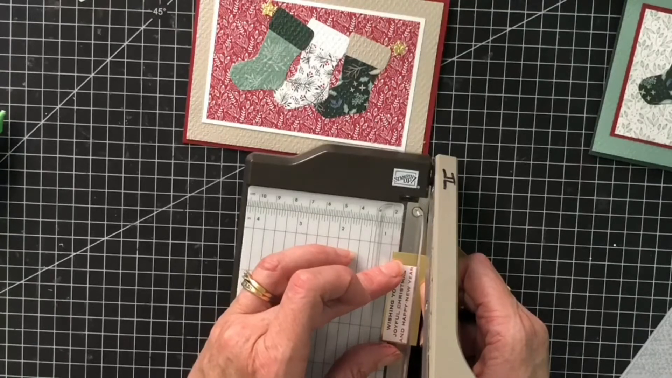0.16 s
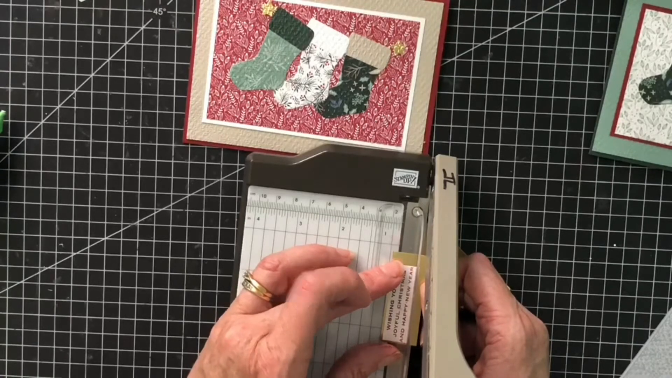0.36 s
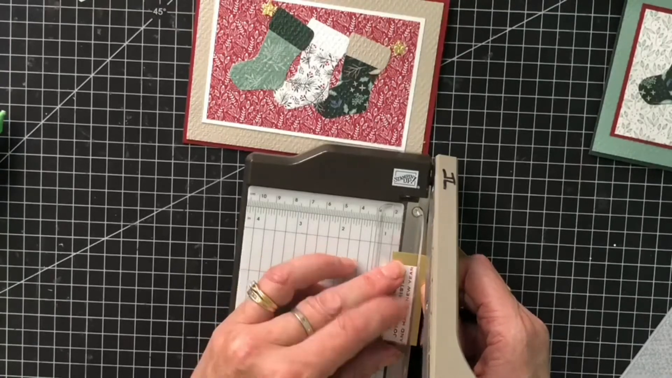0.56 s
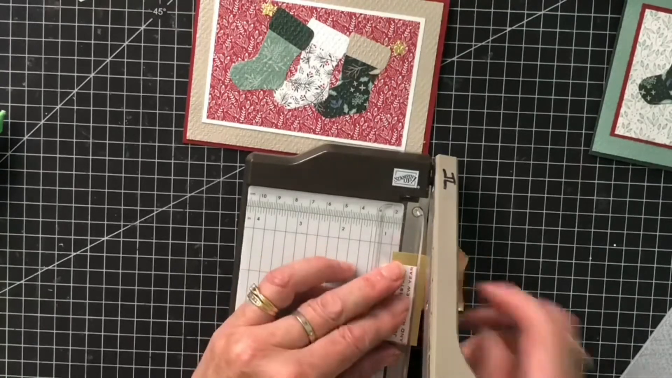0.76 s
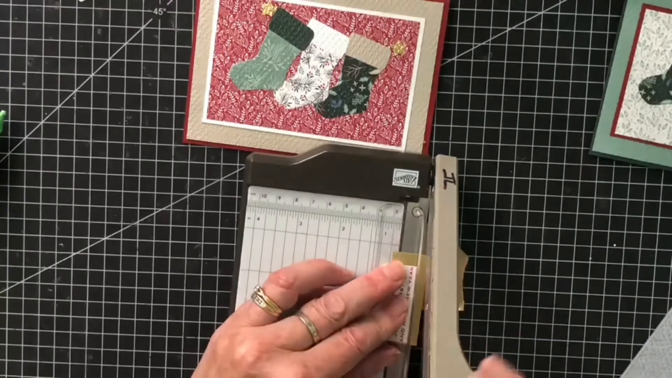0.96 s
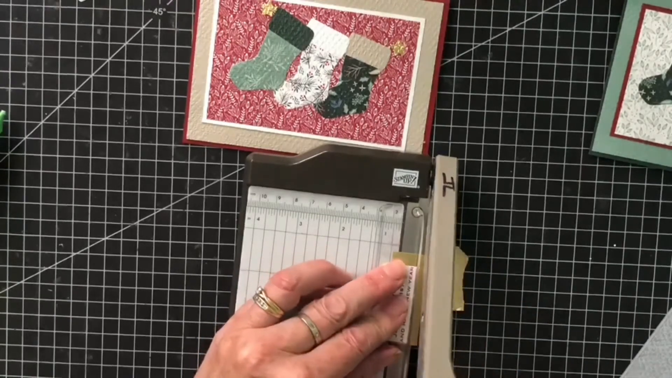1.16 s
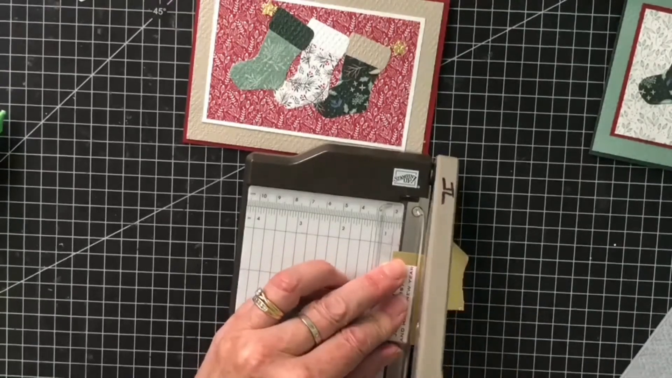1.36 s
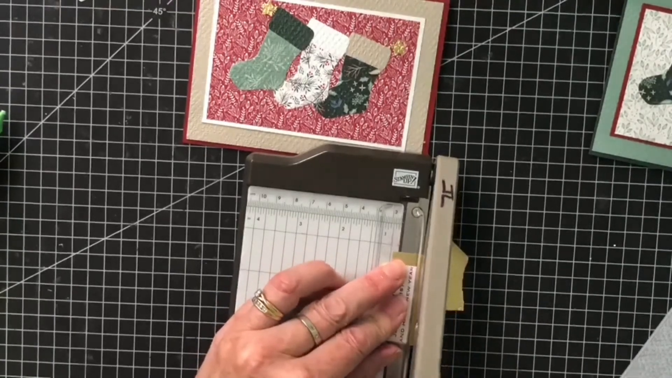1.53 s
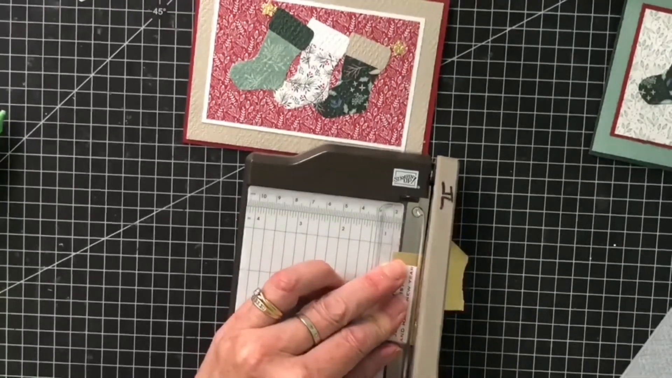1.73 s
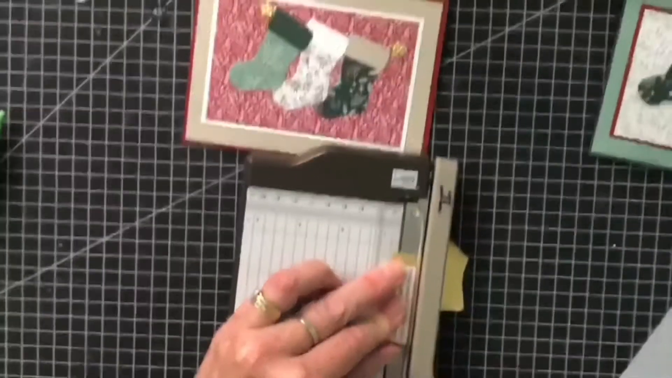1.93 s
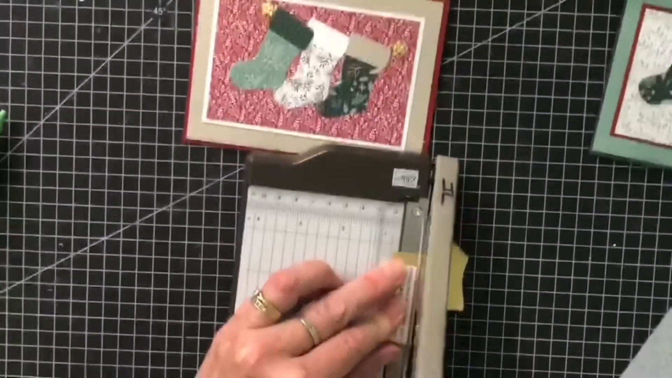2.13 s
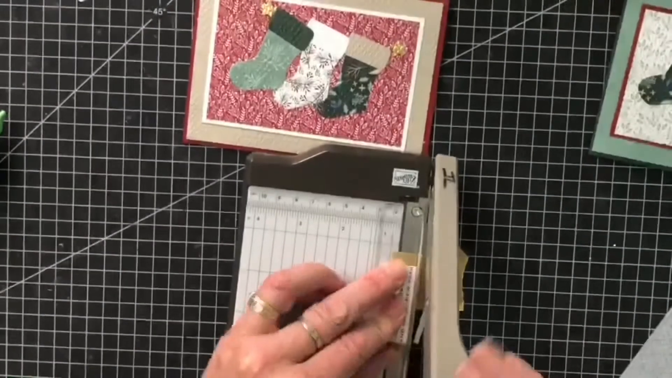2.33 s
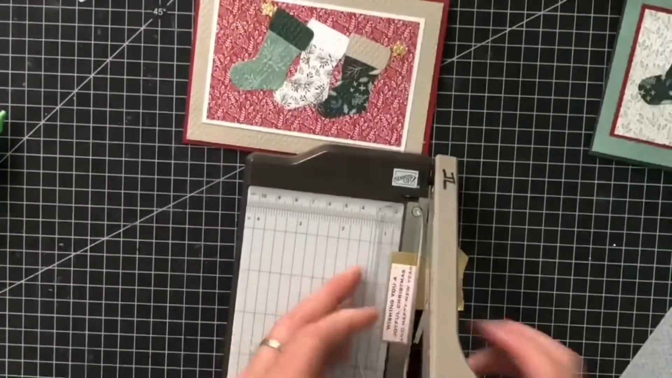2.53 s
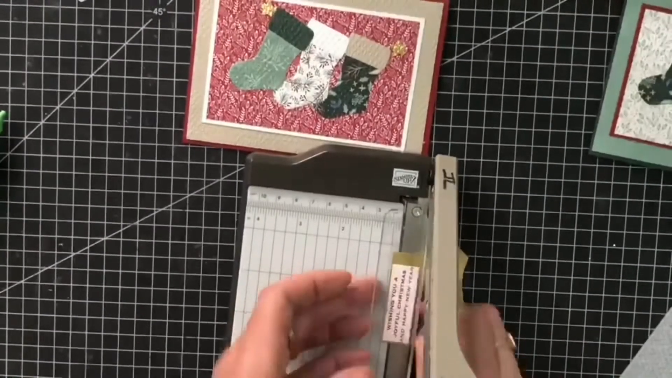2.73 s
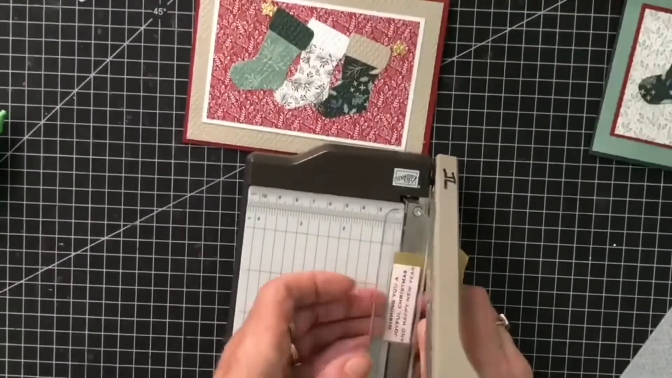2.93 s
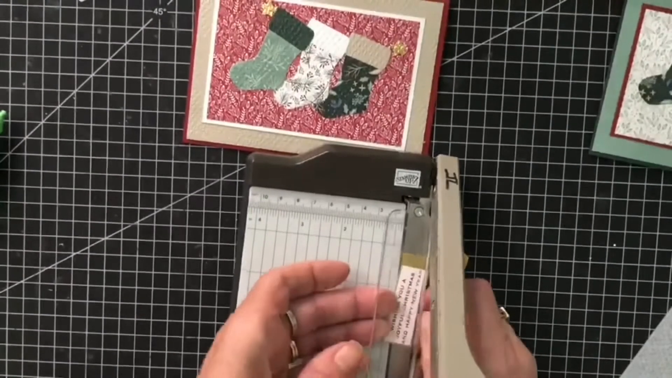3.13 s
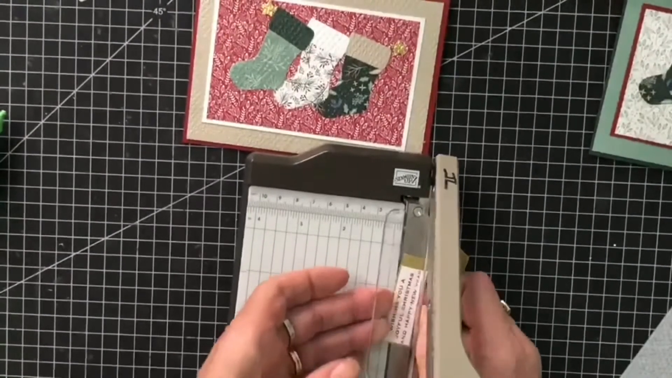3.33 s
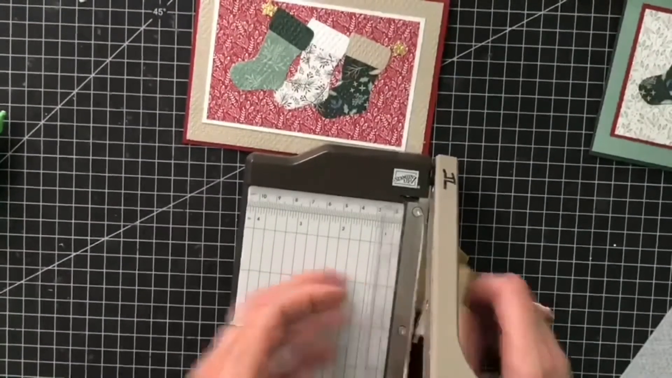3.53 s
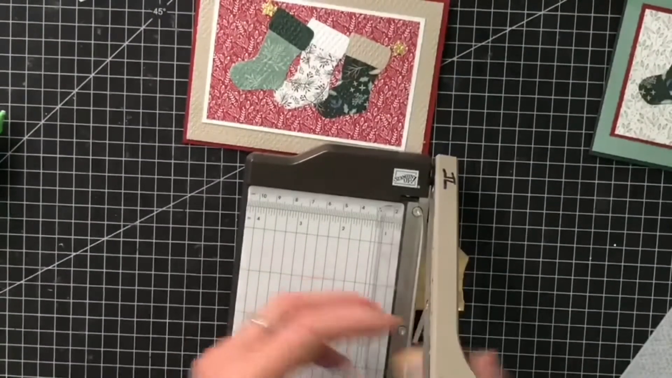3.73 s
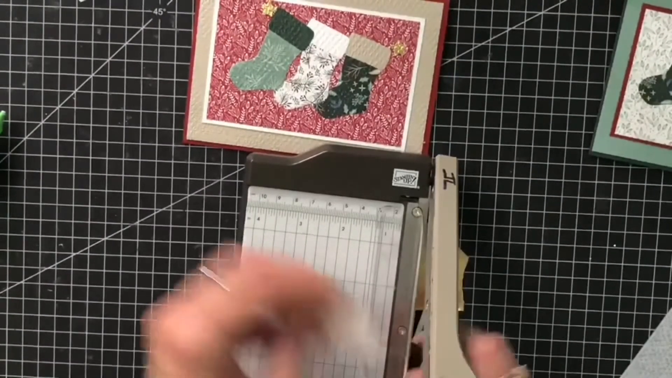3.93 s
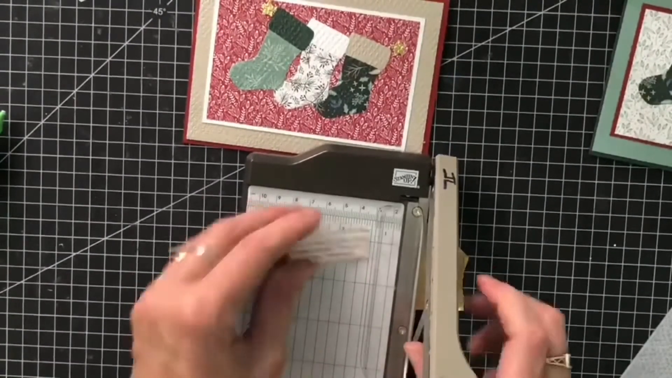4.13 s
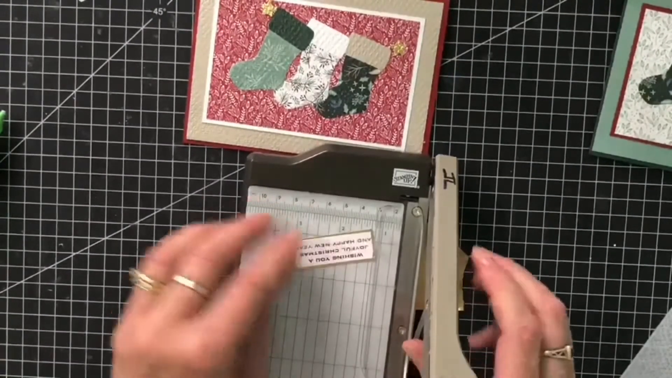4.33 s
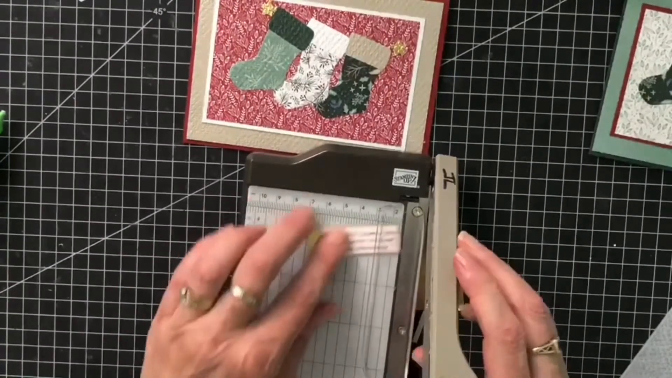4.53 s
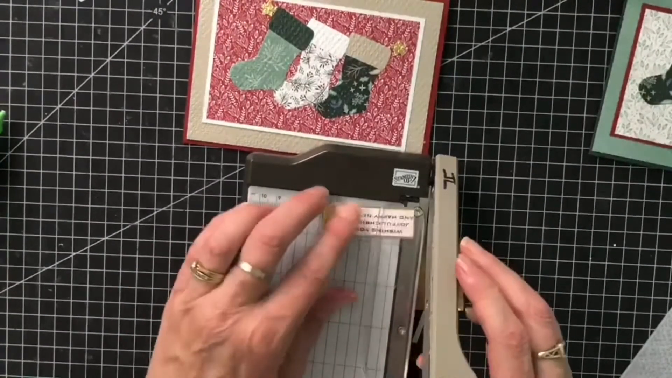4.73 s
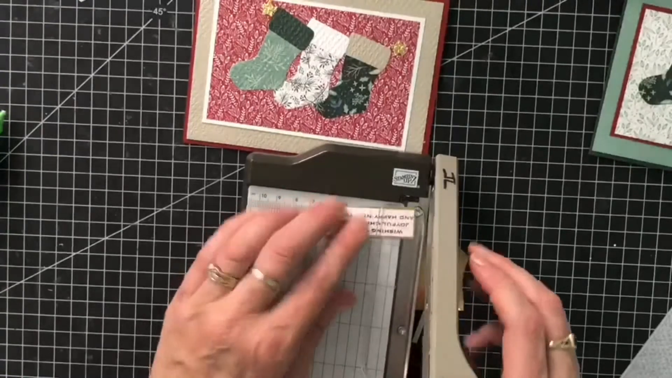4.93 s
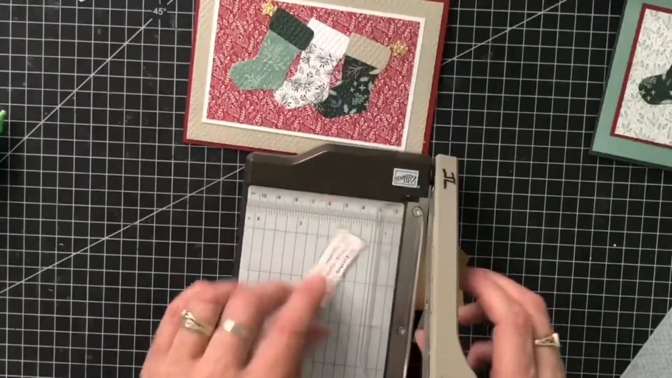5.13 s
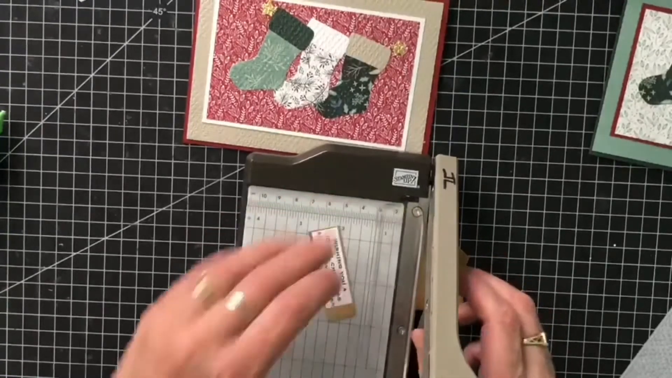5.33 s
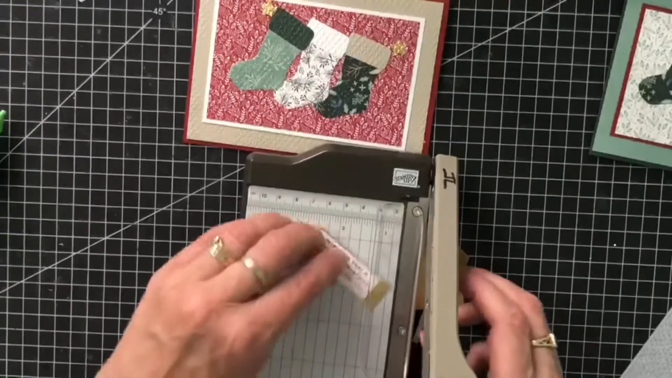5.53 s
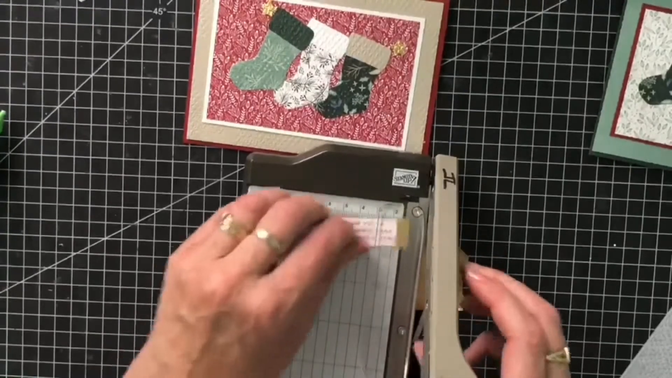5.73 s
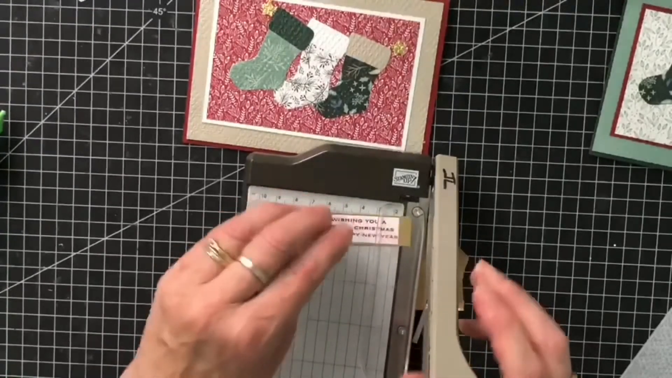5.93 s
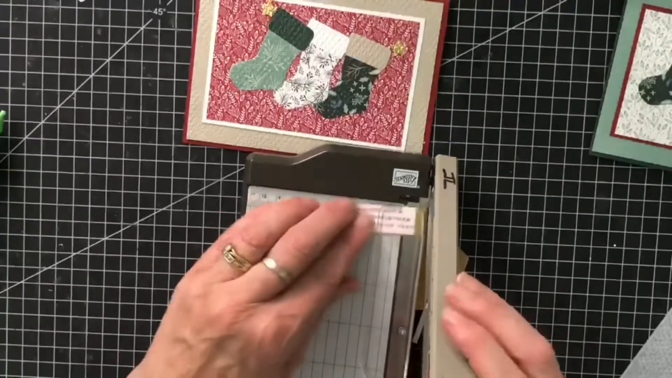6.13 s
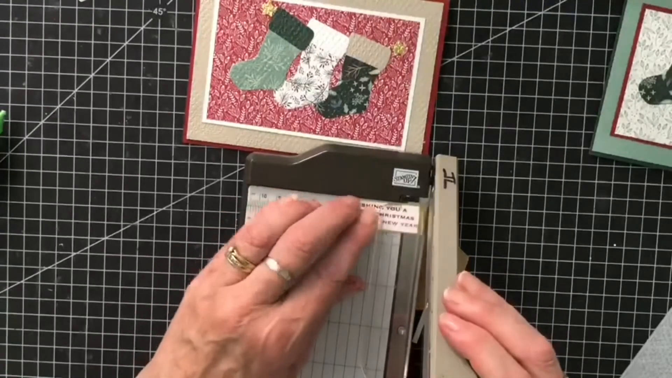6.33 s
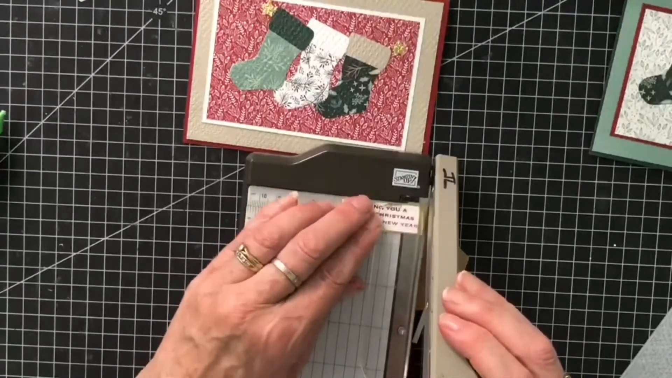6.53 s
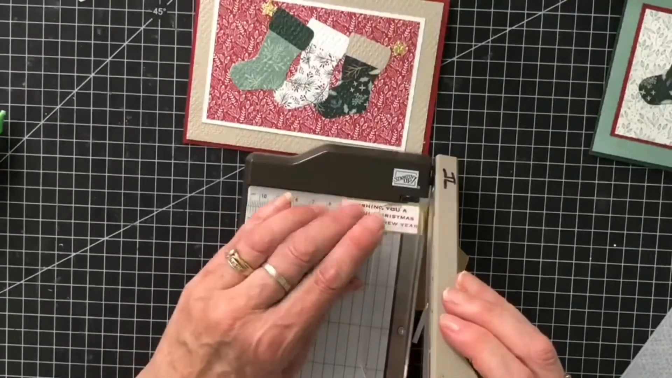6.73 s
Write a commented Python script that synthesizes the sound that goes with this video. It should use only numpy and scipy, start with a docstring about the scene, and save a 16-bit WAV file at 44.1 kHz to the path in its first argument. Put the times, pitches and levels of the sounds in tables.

```python
"""A soft knock of an arm in its frame is heard first, over faint hiss; then a blade grinds on a steel edge.
A small guillotine trimmer cuts card close by in a small room: stick-slip excites the blade's resonances,
snapping fibres tear, the arm cracks onto its stop, and the blade scrapes and squeaks as it is lifted.
Then card flicks and slides as filtered contact bursts and grains, fingers tap the hollow plastic bed,
and the decaying modes of the table boom under the blows."""
import sys
import numpy as np
from scipy import signal
from scipy.fft import rfft, irfft, next_fast_len
from scipy.io import wavfile
from scipy.ndimage import uniform_filter1d

SR = 44100
rng = np.random.default_rng(int(sys.argv[2]) if len(sys.argv) > 2 else 0)


def master_out(mix):
    """Clip the mix to full scale and print it as 16-bit PCM to the path in sys.argv[1]."""
    frames = np.transpose(np.atleast_2d(mix))
    ceiling = np.clip(frames, -1, 1)
    pcm = np.round(ceiling * 32767).astype(np.int16)
    wavfile.write(sys.argv[1], SR, pcm)


N = 302967
T = np.arange(N) / SR  # time in seconds
TOP_HZ = 16200  # upper limit of the sound

# Source levels below are nominal: filters, wavering, the plastic base and the room act after them.
# Colours are spectral envelopes. Each row: frequency in Hz, gain in dB.

# The bare blade rubbing along its steel edge, down and up again.
# Each row: start in seconds, length in seconds, mid-push level in dB, swell over the push in dB.
GRIND = [(1.032, 0.38, -50, 12.5), (2.041, 0.0081, -41.5, -9.5), (2.069, 0.057, -51.5, -8.5),
         (2.134, 0.071, -45.5, -7), (2.225, 0.043, -55, -2)]
# The blade biting through the card, hardest near the end of the strip. Each row: start in seconds,
# length in seconds, groan level in dB, tearing level in dB, swell of the groan over the push in dB.
BITES = [(1.414, 0.033, -39.5, -50.5, 1), (1.442, 0.078, -38, -53, 0), (1.521, 0.054, -33.5, -44.5, 5.5),
         (1.577, 0.046, -34, -39, -0.5), (1.753, 0.027, -31, -39.5, 4), (1.797, 0.03, -43, -44, -0.5)]
# The blade scraping back up past the cut edge.
# Each row: start in seconds, length in seconds, mid-push level in dB, swell over the push in dB.
LIFT = [(1.994, 0.044, -53.5, 14.5), (2.045, 0.12, -44.5, -1.5)]
# Resonances of the rubbed blade. Each row: frequency in Hz, width of one filter pass in Hz, gain in dB.
BLADE = [(137, 46, -1.5), (274.2, 48, 6), (340, 36, -3), (423.7, 27, -4.5), (517, 51, -13), (726, 50, -25),
         (1050, 270, -25), (1616, 77, -27), (1840, 120, -29), (2850, 400, -31.5)]
SHEAR_COLOUR = [(280, -19.5), (500, -3.5), (630, -10.5), (740, -4.5), (900, -12.5), (1080, -7),
                (1280, -2.5), (1440, -15), (1750, -4), (2400, -17.5), (3000, -12.5), (4900, -15),
                (6800, -14), (8500, -18), (14000, -20.5), (16000, -32)]  # snapping fibres
LIFT_COLOUR = [(240, -30), (400, -6.5), (800, -2), (1460, -4), (1630, 3.5), (2090, -0.5), (2930, -1.5),
               (6440, -10.5), (12100, -11.5), (16000, -28.5)]  # steel brushing the fresh cut
# Each push takes hold over a share of its length, then dies away over a t60 in seconds.
GRIP_SHARE, PUSH_T60 = .17, 0.094
TEAR_STEEPNESS = 1.9  # swell of the tearing in dB per dB of groan swell
# Brief rings of the rising blade: rate per second, lowest and highest pitch in Hz, t60 in seconds,
# level in dB against the scrape.
CHIRPS_PER_S, CHIRP_LOW_HZ, CHIRP_HIGH_HZ, CHIRP_T60, CHIRP_DB = 200, 1635, 5380, 0.027, -1.5

# The arm hitting its stop and bouncing. Each row: start in seconds, peak in dB.
STOP = [(1.8176, -1), (1.819, -5), (1.838, -18.5)]
STOP_COLOUR = [(180, -19.5), (300, -6), (480, -15.5), (660, -15.5), (950, -5.5), (1170, -23), (1450, -14),
               (1850, -22.5), (2450, -9), (3150, -10), (3900, -12), (4800, -11.5), (5600, -18.5),
               (7200, -15.5), (8150, -7), (8700, -13.5), (9600, -21.5), (13300, -15), (16000, -25.5)]  # the crack and rattle of arm and frame
# Ring of the arm and frame. Each row: frequency in Hz, relative level in dB, t60 in seconds.
FRAME = [(166, -4, 0.018), (203, -4, .08), (243, -6.5, 0.16), (254, -9, 0.1), (433, -23, 0.041),
         (528, -23.5, 0.11), (969, -17, 0.02)]

# Squeaks of the blade. Each row: start in seconds, length in seconds, mid-squeak pitch in Hz,
# glide in Hz per second, level in dB.
SQUEAKS = [(1.094, 0.022, 1924, -3000, -59), (1.205, 0.22, 1550, 300.5, -71),
           (2.054, 0.01, 6420, -3, -34.5), (2.13, 0.039, 1979, -500, -33),
           (2.171, 0.038, 1945, -800, -36.5)]
# Close blade modes that beat as they ring on after a squeak.
# Each row: frequency in Hz, width in Hz, gain in dB.
SING = [(2100, 2.9, -12), (2040, 4.3, -13.5)]
# A squeak's attack and t60 in seconds, and its swell over the push in dB.
SQUEAK_ATTACK_S, SQUEAK_T60, SQUEAK_SWELL_DB = 0.0098, 0.033, -2
# Depths of waver in level (dB), pitch (share of the pitch) and phase (radians, from uneven slips).
FLUTTER_DB, JITTER, SQUEAK_ROUGH = 1, 0.0083, .2

# Card edges catching and flicking free. Each row: start in seconds, peak in dB, brightness in Hz.
FLICKS = [(1.783, -24.5, 6877), (1.803, -27, 3133), (2.0377, -31.5, 2701), (2.075, -29, 7600),
          (2.365, -41, 2588), (2.3725, -35, 1741), (2.409, -35, 4500), (2.42, -37, 5481),
          (2.4336, -31, 6126), (2.4417, -26, 6345), (2.463, -33.5, 4106), (2.572, -27.5, 3316),
          (2.6552, -47, 9000), (2.69, -26.5, 3467), (2.7006, -18.5, 7670), (2.835, -45.5, 3217),
          (3.218, -46.5, 3160), (3.3452, -45.5, 7005), (3.5011, -40.5, 6016), (3.5252, -22, 7032),
          (3.535, -25, 6510), (3.546, -24, 6870), (3.573, -27.5, 6486), (3.799, -46.5, 7000),
          (4.152, -53, 13100), (4.9527, -40.5, 4055), (5.035, -46, 2518), (5.08, -46, 2940),
          (5.416, -43.5, 2766), (6.0964, -51, 4514), (6.655, -49, 7997), (6.682, -41.5, 1702),
          (6.6994, -43, 5520), (6.708, -43, 2200), (6.754, -50.5, 2309)]
# Card sliding over the bed and against the blade.
# Each row: start in seconds, length in seconds, level in dB, brightness in Hz.
SLIDES = [(2.055, 0.032, -42.5, 6400), (2.399, 0.1, -48.5, 5497), (2.68, 0.032, -44.5, 3018),
          (2.846, 0.5, -72, 2400), (3.348, 0.18, -65.5, 1860), (3.5, .025, -52, 3980),
          (3.514, 0.1, -44, 5510), (4.415, .041, -61, 2304), (4.561, 0.04, -61, 2570),
          (4.956, .025, -51, 3600), (5.027, 0.11, -66, 3428), (5.629, 0.046, -64, 2113),
          (6.653, 0.065, -59, 2174)]
CARD_COLOUR = [(180, -26.5), (400, -5), (520, -14.5), (780, -2.5), (950, -11.5), (1350, -0.5), (1520, -5),
               (1690, 3), (1930, -4), (2300, -0.5), (3050, -4.5), (3500, -3.5), (3800, -7.5), (4150, -6.5),
               (5200, -10), (6400, -5), (7400, -8), (8300, -5.5), (10500, -12.5), (12500, -6), (16000, -17)]
EDGE_WIDTH_HZ, EDGE_RING_DB = 140, 2.5  # resonance of a free card edge
FLICK_BOOM_DB = -23  # a flick nudges the table: level against the flick
# Snags of a sliding edge: rate per second, level in dB against the rasp; then the fade over a slide in dB.
SNAGS_PER_S, SNAG_DB, SLIDE_FADE_DB = 60, -4.5, -4.5

# Fingers and card tapping the plastic bed.
# Each row: start in seconds, peak in dB, contact bandwidth in Hz, peak of the table boom in dB.
TAPS = [(1.7496, -37, 2500, -36), (1.777, -28, 1100, -31), (4.819, -44.5, 299.3, -49.5),
        (5.697, -38.5, 2000, -43.5), (5.998, -36.5, 1900, -46), (6.005, -33.5, 1460, -58),
        (6.129, -47, 299, -47.5)]
BED_COLOUR = [(70, -38.5), (190, -1.5), (390, 5.5), (560, -2), (680, -11), (1150, -12), (1550, -4),
              (2100, -10), (4200, -20.5), (12000, -5.5)]
# The arm knocking in its frame as the hand takes or leaves it.
# Each row: start in seconds, peak in dB, contact bandwidth in Hz, peak of the table boom in dB.
KNOCKS = [(.556, -35, 11200, -39.5), (4.399, -40, 3500, -42), (5.398, -38.5, 695, -30),
          (6.434, -41, 3000, -51.5)]
ARM_COLOUR = [(250, -15), (520, -10), (680, -10), (800, -2.5), (1100, -2), (1500, -11.5), (1720, -1.5),
              (2000, -9), (3300, -6), (14000, -7.5)]
# The table's boom as the card gives way and as the arm lands. Each row: start in seconds, peak in dB.
JOLTS = [(1.775, -26), (1.817, -13.5)]
# The hands softly bumping the trimmer and table. Each row: start in seconds, peak in dB.
BUMPS = [(2.361, -43.5), (2.495, -43), (2.608, -44), (2.79, -36.5), (3.189, -41), (3.409, -34),
         (3.894, -50.5), (4.926, -44.5), (6.681, -50.5)]
# Modes of the table top. Each row: frequency in Hz, relative level in dB, t60 in seconds.
TABLE = [(66, -17, 0.7), (94.6, -15.5, 0.42), (134.66, 0, 0.39), (144, 4.5, 0.031), (154.7, -5.5, 0.3),
         (237, -17, 0.4)]
JOLT_LOOSE_DB, BUMP_LOOSE_DB = -12, -5  # shudder of loose things against the table's ring
JOLT_LOW_HZ, BUMP_LOW_HZ = 99.3, 60.1  # a short, hard blow hardly moves the lowest modes
JOLT_RISE_S, BUMP_RISE_S = 0.003, 0.0076  # a soft hand sets the table moving more slowly

# Hollow resonances of the plastic base. Each row: frequency in Hz, width in Hz, gain in dB.
BASE = [(414, 14, 0), (564, 18, -0.5), (745, 130, -4.5), (1013, 99, -5), (1270, 69, -5.5),
        (1536, 210, -8.5), (2420, 39, -10.5), (2788, 59, -10), (3050, 270, -8), (3481, 28, -7),
        (6520, 500, -9.5)]
BASE_DIRECT_DB = -1  # contact sound passed on unfiltered
# Spectrum of the quiet room. Each row: frequency in Hz, relative level in dB per Hz.
AIR = [(30, -27), (70, -2), (190, -5), (750, -17.5), (1480, -19), (3920, -21.5), (13600, -30.5),
       (16000, -41.5)]
AIR_DB = -68.5  # rms level of the room noise


def cut():
    """Friction and fracture: the blade groans, fibres snap with its swing, and rising steel brushes and chirps."""
    swing = blade()
    snap_gain = undb(2.2 * swing + 2 * waver(70))  # snaps cluster on each swing
    snaps = colour(grains(N, per_s=2600, spread_db=-0.34) * snap_gain, SHEAR_COLOUR)
    brush = colour(grains(N, per_s=2200, spread_db=1.5) * undb(2.2 * waver(110)), LIFT_COLOUR)
    rising = unit(unit(brush) + undb(CHIRP_DB) * chirps())

    groan = sum(push(*row) for row in GRIND)
    groan = groan + sum(push(s, length, db, swell) for s, length, db, _, swell in BITES)
    tear = sum(push(s, length, db, TEAR_STEEPNESS * swell) for s, length, _, db, swell in BITES)
    lift = sum(push(*row) for row in LIFT)
    scrape = roam(unit(snaps) * tear + rising * lift, depth_db=3.5, per_s=80)
    return swing * groan + scrape


def blade():
    """Stick-slip friction excites the blade's modes; the pressure of the hand holds the swing steady."""
    slips = grains(N, per_s=2100, spread_db=4.5) * undb(0.5 * waver(30))
    modes = sum(undb(db) * resonate(slips, hz, width) for hz, width, db in BLADE)
    swing = butter(modes, 77, "high")
    return swing / np.sqrt(uniform_filter1d(swing ** 2, size=1500))  # level by a 34 ms running rms


def chirps():
    """Transient modal excitation: steel grips and lets go, ringing at scattered pitches, the high ones weaker."""
    out, t = np.zeros(N), T[:SR // 10]
    fade = (1 - np.exp(-t / .003)) * decay(t, CHIRP_T60)
    for when, pitch, strength in rng.random((int(CHIRPS_PER_S * N / SR), 3)):
        hz = CHIRP_LOW_HZ * (CHIRP_HIGH_HZ / CHIRP_LOW_HZ) ** pitch
        add(out, when * N / SR, strength / np.sqrt(hz) * fade * np.sin(2 * np.pi * hz * t))
    return unit(out)


def push(s, length, db, swell_db):
    """Driven friction: gain of one push of the hand on the arm."""
    return undb(db) * stroke(s, length, swell_db, GRIP_SHARE * length, PUSH_T60)


def stroke(s, length, swell_db, attack_s, t60):
    """Envelope of a driven contact: it takes hold, swells steadily in dB (0 at its middle) and dies away."""
    progress = np.clip((T - s) / length, 0, 1)
    attack = np.clip((T - s) / attack_s, 0, 1)
    hold = undb(swell_db * (progress - .5))
    return attack * hold * decay(np.clip(T - s - length, 0, 1), t60)


def clack():
    """Impact: the arm cracks onto its stop, bounces, and excites the modes of the frame."""
    out = np.zeros(N)
    for s, db in STOP:
        add(out, s, undb(db) * peak(colour(burst(t60=0.015, rise_s=0.00013), STOP_COLOUR)))
    add(out, STOP[1][0], undb(-8.0) * peak(ring(FRAME, rise_s=0.0016, scatter_db=2.0)))
    return butter(out, 80, "high")


def clatter(clatter_db=-25, t60=.23, rise_s=0.0046, dull_hz=3800):
    """Repeated small impacts: after landing, arm and frame rattle with the crack's colour, duller, and settle."""
    out, t = np.zeros(N), T[:SR]
    rattle = unit(soften(colour(grains(SR, per_s=3500, spread_db=2.0), STOP_COLOUR), dull_hz))
    add(out, STOP[1][0], undb(clatter_db) * rattle * (1 - np.exp(-t / rise_s)) * decay(t, t60))
    return out


def squeaks(buzz_db=-21.5, falloff=1.8):
    """Mode locking: slips sing on one blade mode; relative overtones grow in proportion to its level."""
    out = np.zeros(N)
    for s, length, hz, glide, db in SQUEAKS:
        pitch = hz + glide * np.clip(T - s - length / 2, -length, length)
        phase = 2 * np.pi * np.cumsum(pitch * (1 + JITTER * waver(400))) / SR
        phase = phase + SQUEAK_ROUGH * waver(1500)
        envelope = stroke(s, length, SQUEAK_SWELL_DB, SQUEAK_ATTACK_S, SQUEAK_T60)
        gain = undb(db + FLUTTER_DB * waver(120)) * envelope
        overtones = sum(k ** -falloff * np.sin((k + 1) * phase)
                        for k in range(1, 6) if (k + 1) * hz < TOP_HZ)
        out += np.sqrt(2) * gain * (np.sin(phase) + gain / undb(buzz_db) * overtones)
    return out + sum(undb(db) * single_resonance(out, hz, width) for hz, width, db in SING)


def card():
    """Elastic release and friction: stiff card ticks as its edges slip free, and rasps and snags as it slides."""
    out = np.zeros(N)
    for s, db, hz in FLICKS:
        add(out, s, undb(db) * tick(hz))
        add(out, s, undb(db + FLICK_BOOM_DB) * boom())
    for s, length, db, hz in SLIDES:
        size = int(length * SR)
        contact = unit(grains(size, per_s=1400, spread_db=-1.5)) + undb(SNAG_DB) * unit(snags(size))
        rasp = unit(card_tone(contact, hz))
        fade = undb(SLIDE_FADE_DB * np.linspace(-.5, .5, size))
        add(out, s, undb(db) * rasp * fade * signal.windows.tukey(size, .3))
    return roam(out, depth_db=3.2, per_s=100)


def tick(hz):
    """Elastic release: a stiff edge snaps free and rings briefly at its own note."""
    snap = card_tone(burst(t60=0.02, rise_s=0.0021), hz)
    return peak(snap + undb(EDGE_RING_DB) * single_resonance(snap, hz, EDGE_WIDTH_HZ))


def snags(size, spread_db=3.5):
    """Intermittent friction: short cracks at uneven intervals along a slide."""
    count = int(size / SR * SNAGS_PER_S) + 1
    place, strength = rng.random((count, 2)).T
    catches = np.zeros(size)
    index = ((np.arange(count) + place) / count * size).astype(int)
    catches[index] = undb(spread_db * (2 * strength - 1))
    return signal.fftconvolve(catches, burst(t60=.018, rise_s=.0004))[:size]


def card_tone(x, hz):
    """Plate radiation: a shorter free edge centres the band higher; some of the whole sheet always sounds."""
    sheet = colour(x, CARD_COLOUR)
    limits = [hz / 1.5, min(hz * 2.2, .45 * SR)]
    edge = signal.lfilter(*signal.butter(1, limits, "band", fs=SR), sheet)
    return edge + undb(-13.5) * sheet


def knocks():
    """Contact bandwidth: softer touches on bed and arm are duller; blows and bumps boom in the table."""
    out = np.zeros(N)
    for s, db, hz, boom_db in TAPS:
        tap = butter(colour(burst(t60=0.011, rise_s=0.0001), BED_COLOUR), hz, "low")
        add(out, s, undb(db) * peak(tap))
        add(out, s, undb(boom_db) * boom())
    for s, db, hz, boom_db in KNOCKS:
        knock = soften(colour(burst(t60=0.036, rise_s=0.0001), ARM_COLOUR), hz)
        add(out, s, undb(db) * peak(knock))
        add(out, s, undb(boom_db) * boom())
    for s, db in JOLTS:
        add(out, s, undb(db) * boom(JOLT_LOOSE_DB, JOLT_LOW_HZ, JOLT_RISE_S))
    for s, db in BUMPS:
        add(out, s, undb(db) * boom())
    return out


def boom(loose_db=BUMP_LOOSE_DB, low_hz=BUMP_LOW_HZ, rise_s=BUMP_RISE_S):
    """Modal response: a bump rings the table's modes and sets the loose things on it shuddering."""
    modes = ring(TABLE, rise_s=rise_s, scatter_db=2.5)
    shudder_colour = [(30, -36), (75, 4.5), (170, -11.0), (330, -24.0), (700, -53.5)]  # (Hz, dB)
    shudder = colour(rng.standard_normal(len(modes)), shudder_colour)
    shudder *= decay(T[:len(modes)], .35)
    return peak(butter(peak(modes) + undb(loose_db) * peak(shudder), low_hz, "high"))


def base(x):
    """Coupled resonance: the plastic base passes each contact on and rings briefly with it."""
    hollow = sum(undb(db) * single_resonance(x, hz, width) for hz, width, db in BASE)
    return undb(BASE_DIRECT_DB) * x + hollow


def room(x, wet_db, t60, treble_t60, wall_s):
    """Reverberation: near surfaces answer weakly first, the walls more strongly; the treble dies sooner."""
    t = T[:SR // 2]
    low, high = rng.standard_normal((2, len(t))) * decay(t, np.array([[t60], [treble_t60]]))
    tail = butter(low, 6500, "low") + undb(3.0) * butter(high, 9900, "high")
    tail = tail * np.where(t > wall_s, 1, .45) * (t > .003)  # no reflection before 3 ms
    tail = unit(tail) / np.sqrt(len(t))  # total energy 1
    return x + undb(wet_db) * signal.fftconvolve(x, butter(tail, 240, "high"))[:N]


def air():
    """Background noise: a faint hiss and rumble whose level wavers slightly."""
    return undb(AIR_DB) * unit(colour(rng.standard_normal(N), AIR)) * undb(0.24 * waver(17))


def grains(size, per_s, spread_db):
    """Random impulses as tiny slips: a positive spread makes a few much stronger, a negative one weaker."""
    chance = rng.random((size, 2))
    strength_db = -spread_db * np.log(np.maximum(chance[:, 1], np.exp(-4)))
    return (chance[:, 0] < per_s / SR) * undb(strength_db) * rng.choice([-1, 1], size)


def burst(t60, rise_s):
    """High modal density: one contact cracks as many modes of nearly equal strength that die at once."""
    t = T[:SR // 4]
    noise = rng.standard_normal(len(t)) * (1 - np.exp(-t / rise_s))
    spectrum = rfft(noise * decay(t, max(t60, 1e-3)))
    return irfft(spectrum / np.abs(spectrum) ** .7)[:len(t) // 2]  # flatten the spectrum, keep its phase


def ring(modes, rise_s, scatter_db):
    """Modal decay: damped sines whose mix depends on where the blow lands, drawn at random."""
    t = T[:SR]
    tones = sum(undb(db + scatter_db * rng.standard_normal()) * np.sin(2 * np.pi * hz * t) * decay(t, t60)
                for hz, db, t60 in modes)
    return tones * (1 - np.exp(-t / rise_s))


def roam(x, depth_db, per_s):
    """Moving contact point: third-octave bands above 500 Hz, and all below as one, swell and fade separately."""
    spectrum, out = rfft(x), 0
    band = 3 * np.log2(np.clip(np.arange(len(spectrum)) * SR / N / 500, 1, 32))
    for k in np.arange(np.ceil(band.max()) + 1):
        part = irfft(spectrum * np.clip(1 - np.abs(band - k), 0, 1), N)
        out = out + part * undb(depth_db * np.clip(waver(per_s), -2, 2))
    return out * np.std(x) / np.std(out)


def waver(rate):
    """Smoothed randomness: straight lines between random values, rate of them per second, spread near 1."""
    k = int(SR / rate)
    return uniform_filter1d(np.repeat(rng.standard_normal(N // k + 1), k)[:N], k)


def colour(x, points):
    """Minimum-phase filtering: a causal filter through (Hz, dB) points, by way of the cepstrum."""
    size = 2 * next_fast_len(len(x))
    octave = np.log2(np.maximum(np.arange(size // 2 + 1) * SR / size, 1))
    hz, db = np.transpose(points)
    cepstrum = irfft(np.log(undb(np.interp(octave, np.log2(hz), db))))
    cepstrum[1:size // 2] *= 2  # fold the anticausal half onto the causal one
    cepstrum[size // 2 + 1:] = 0
    return irfft(rfft(x, size) * np.exp(rfft(cepstrum)))[:len(x)]


def single_resonance(x, hz, width):
    """Simple resonance: one second-order peak, width in Hz."""
    return signal.lfilter(*signal.iirpeak(hz, hz / width, SR), x)


def resonate(x, hz, width):
    """Cascaded resonance: two equal peaks in series give steep flanks."""
    return single_resonance(single_resonance(x, hz, width), hz, width)


def butter(x, hz, kind):
    """Second-order low-pass or high-pass filtering."""
    return signal.sosfilt(signal.butter(2, min(hz, SR / 2 - 1), kind, fs=SR, output="sos"), x)


def soften(x, hz):
    """First-order low-pass filtering: a gentle loss of treble above hz."""
    return signal.lfilter(*signal.butter(1, min(hz, .45 * SR), fs=SR), x)


def decay(t, t60):
    """Exponential damping: a fall of 60 dB in t60 seconds."""
    return np.exp(-np.log(1000) * t / t60)


def undb(db):
    """Logarithmic level: decibels to amplitude gain."""
    return 10 ** (np.asarray(db) / 20)


def unit(x):
    """Effective level: scale to rms 1."""
    return x / np.sqrt(np.mean(x ** 2))


def peak(x):
    """Peak level: scale to a peak of 1."""
    return x / np.abs(x).max()


def add(out, s, x):
    """Superposition: mix x into out from time s on."""
    i = int(s * SR)
    out[i:i + len(x)] += x[:N - i]


def scene():
    """Direct and reverberant sound: squeaks and stop send only half their amplitude through the room."""
    close = (squeaks() + base(clack())) / 2
    sources = base(cut() + knocks() + card()) + close
    in_room = room(sources, wet_db=-7.0, t60=0.25, treble_t60=.22, wall_s=0.014)
    return (in_room + close + clatter() + air())[None]


def record(dry):
    """Limited range and bandwidth: clipping at full scale, then a steep low-pass."""
    return signal.sosfilt(signal.ellip(8, .2, 70, TOP_HZ, fs=SR, output="sos"), np.clip(dry, -1, 1))


dry = scene()
out = record(dry)
master_out(out)
```